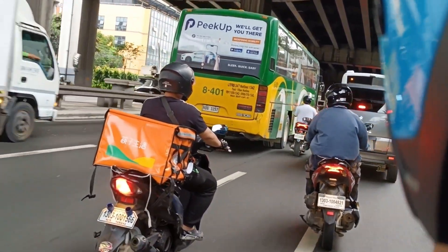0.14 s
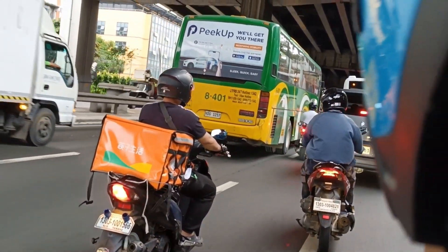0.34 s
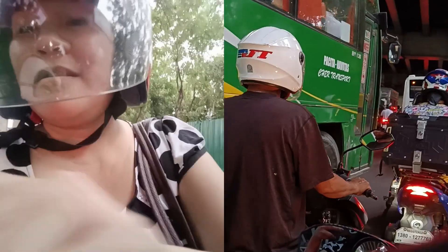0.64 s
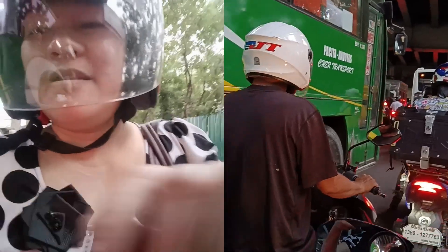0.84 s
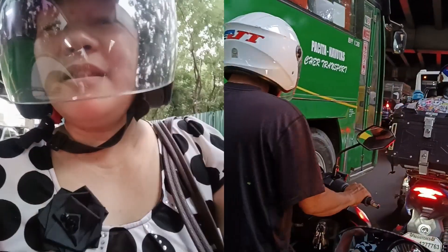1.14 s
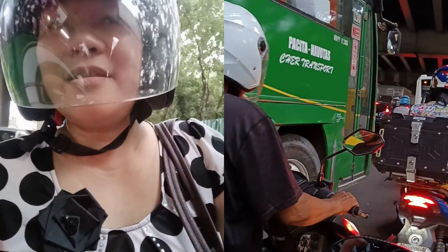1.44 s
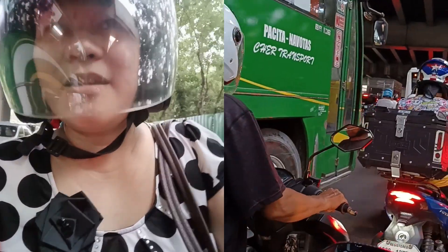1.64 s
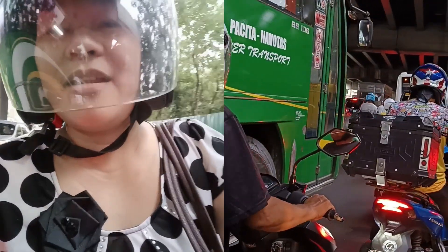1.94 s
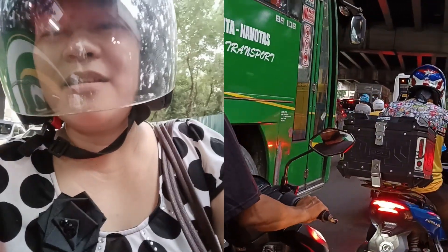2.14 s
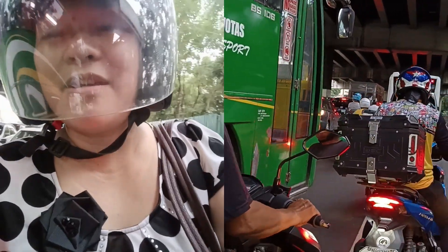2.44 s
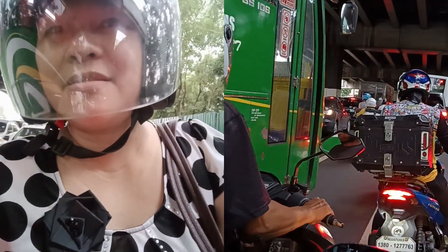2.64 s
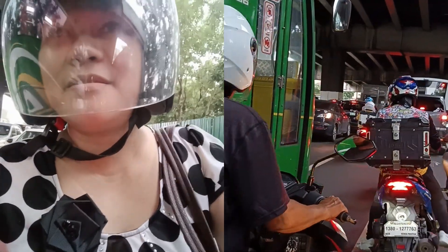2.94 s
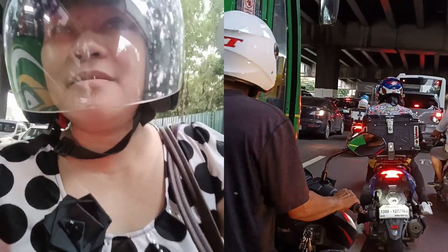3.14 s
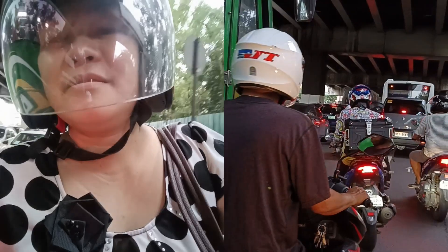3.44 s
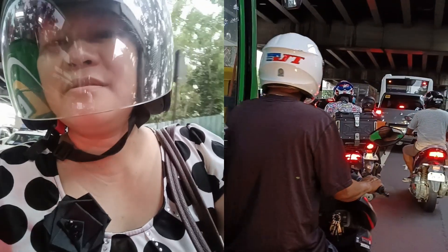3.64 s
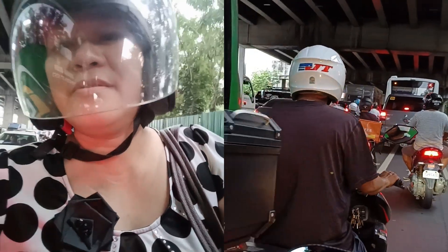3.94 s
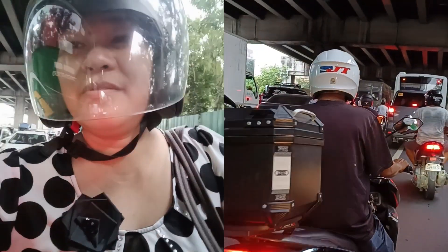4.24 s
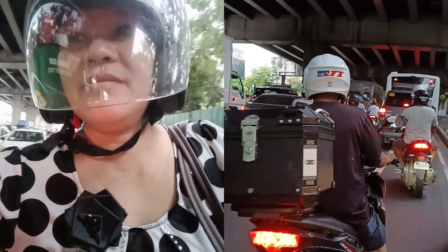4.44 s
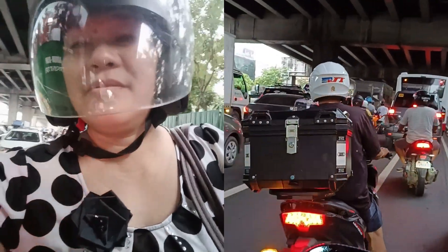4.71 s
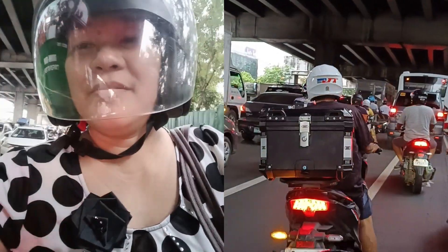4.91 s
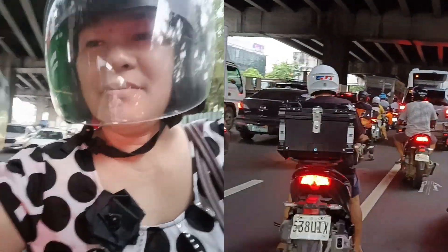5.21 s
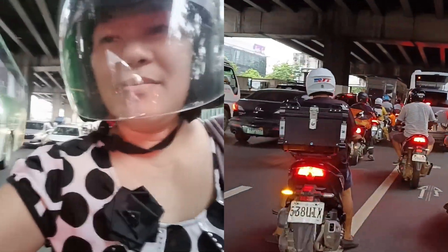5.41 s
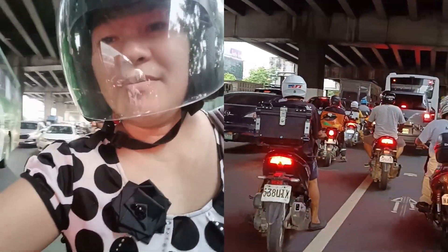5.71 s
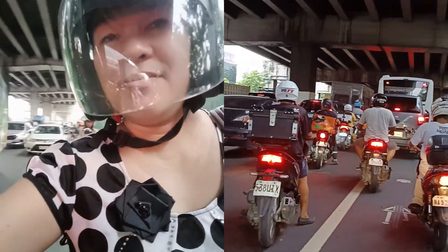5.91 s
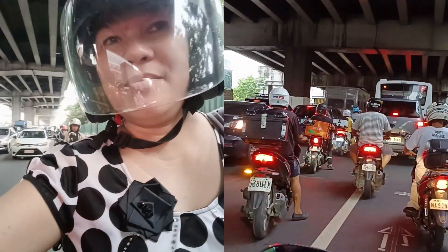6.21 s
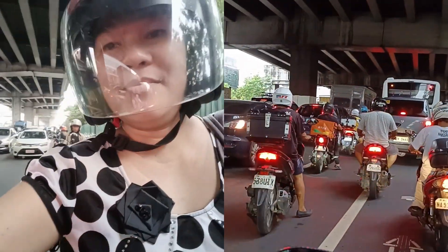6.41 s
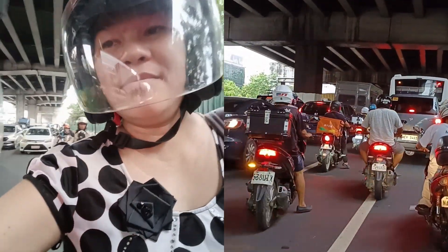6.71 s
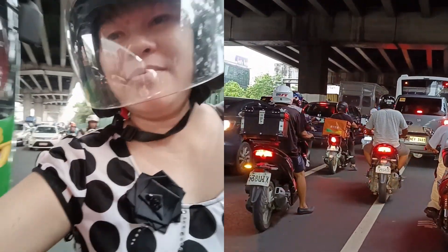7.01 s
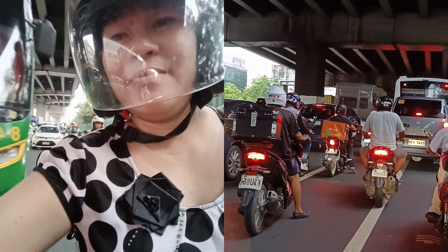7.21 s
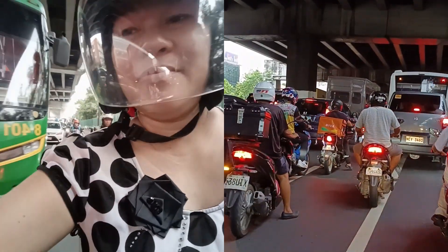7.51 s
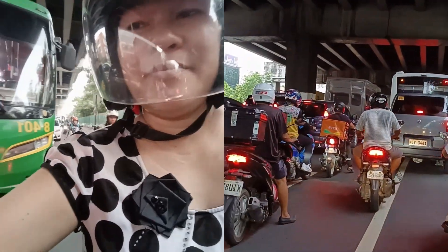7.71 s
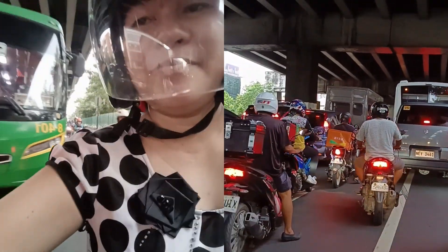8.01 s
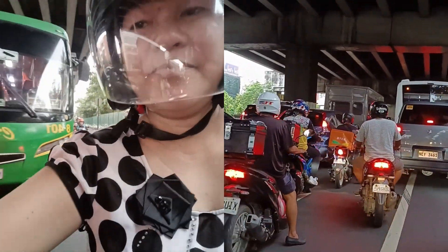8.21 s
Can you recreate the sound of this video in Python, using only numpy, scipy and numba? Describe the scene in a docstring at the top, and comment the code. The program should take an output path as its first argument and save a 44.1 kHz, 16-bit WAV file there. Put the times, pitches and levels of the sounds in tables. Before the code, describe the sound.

Heavy traffic rumble and nearby motorcycle engines under an echoing concrete flyover, a brief silence, then a bus revving, brake squeaks and many short horn toots.

```python
"""Dense traffic crawls under a concrete flyover, heard from a motorcycle seat through two unlike microphone ports.
Throughout, filtered noise makes the traffic rumble and ringing pulses make the nearby motorcycles.
The sound drops out from 0.46 to 1.04 s; then come the end of a passing horn's toot, its second toot, a revving
bus built from sine tones and the first noise squeaks. A car toots from 2 s, a scooter near 3 s, a truck from 5.4 s,
a far horn and a van near 8 s: horns are stacks of sine tones that ring under the deck. A limiter holds the peaks."""
import sys
import numpy as np
from scipy import signal
from scipy.fft import rfft, irfft
from scipy.io import wavfile
from scipy.ndimage import uniform_filter1d, minimum_filter1d
from numba import njit

SR = 44100
rng = np.random.default_rng(int(sys.argv[2]) if len(sys.argv) > 2 else 0)


def master_out(mix):
    """Clip the mix to full scale and print it as 16-bit PCM to the path in sys.argv[1]."""
    frames = np.transpose(np.atleast_2d(mix))
    ceiling = np.clip(frames, -1, 1)
    pcm = np.round(ceiling * 32767).astype(np.int16)
    wavfile.write(sys.argv[1], SR, pcm)


N = 368676

# How loud the traffic is over time. Each row: time in seconds, exhaust rumble in dB, engine clatter in dB,
# tyre and air hiss in dB.
TRAFFIC_LEVELS = [(0.0, -12.5, -22.5, -38), (0.45, -14.5, -24.5, -39), (1.05, -9.5, -18, -34.5),
                  (1.45, -11, -17, -31.5), (1.85, -14, -20.5, -37.5), (2.2, -12.5, -21, -34),
                  (2.65, -13, -19.5, -33), (2.95, -12.5, -20, -32), (3.1, -15, -22.5, -33),
                  (3.45, -15, -23, -39), (4.5, -14, -25, -40.5), (5.6, -14, -23.5, -40),
                  (6.65, -14.5, -24.5, -40.5), (7.25, -16, -25, -43), (7.85, -17.5, -24.5, -38.5),
                  (8.08, -18, -23, -40.5), (8.14, -16.5, -23, -37), (8.36, -16.5, -23, -35)]
# Tone colour of the traffic. Each row: frequency in Hz, relative density in dB per Hz.
TRAFFIC_SPECTRUM = [(12, -40.5), (20, -9.5), (69, -4.5), (138, 0), (228, -6.5), (263, -7.5), (447, -21.5),
                    (1040, -26.5), (1490, -32), (3450, -30), (5710, -51), (6950, -53), (8220, -41),
                    (13600, -67.5), (16100, -68)]
# How alike left and right are. Each row: frequency in Hz, likeness (1 is the same, 0 is unrelated).
LEFT_RIGHT_LIKENESS = [(25, 0.92), (60, 0.98), (180, 0.96), (300, 0.94), (600, 0.61), (1400, 0), (4000, 0),
                       (15000, 0)]
# Engine of the bus. Each row: time in seconds, firing rate in Hz, level in dB.
BUS_REVS = [(1.07, 34.47, -18.5), (1.176, 35.2, -13.5), (1.312, 38.2, -12), (1.554, 40.4, -12),
            (1.712, 40.21, -13.5), (1.986, 37.8, -20), (2.45, 36.2, -19), (2.67, 37.47, -23.5),
            (3.0, 35, -30)]
# Tones of the bus engine. Each row: multiple of the firing rate, relative level in dB.
BUS_TONES = [(2, -3.5), (3, -18), (4, -9.5), (5, 0), (6, -2.5), (7, -6.5), (9, -16)]
# Motorcycles close by. Each row: time in seconds, middle of the exhaust resonance in Hz, middle level in dB.
BIKE_EXHAUSTS = [(0.0, 125, -14.5), (0.45, 131, -21.5), (1.08, 146.6, -17.5), (1.6, 120, -15.5),
                 (1.9, 130.7, -12.5), (2.3, 152, -16.5), (2.95, 148, -14), (3.5, 128, -17),
                 (3.9, 157.3, -13), (4.4, 101.6, -21.5), (4.55, 126, -14), (5.05, 149, -16.5),
                 (5.42, 105.5, -19), (5.85, 124, -11.5), (6.4, 105.5, -18.5), (7.25, 95, -23.5),
                 (7.7, 123.6, -15.5), (7.9, 92, -18.5), (8.18, 102, -15.5), (8.36, 100, -19.5)]
# Brake squeaks and a belt whine. Each row: start in seconds, length in seconds, frequency in Hz,
# width in Hz of each of two equal resonances, level in dB, left minus right in dB.
SQUEAK_EVENTS = [(1.346, 0.32, 990, 36, -30, 8), (2.5, 0.43, 977.5, 19.7, -32, 12),
                 (2.621, 0.078, 8160, 450, -26, 1.5), (3.219, .07, 4380, 124, -30, 0),
                 (3.25, 0.07, 8800, 200, -40, 0), (7.74, .02, 2935, 90, -28, 1)]
# Toots shared by the low and high horn of one vehicle. Each row: start in seconds, length in seconds,
# relative level in dB, left minus right in dB.
CAR_TOOTS = [(2.003, 0.067, -28.5, 3.44), (2.15, 0.11, -29.5, 5.3), (2.31, 0.11, -30, 4.5),
             (2.88, 0.066, -26, 3.5)]
# Toots of the van. Each row: start in seconds, length in seconds, relative level in dB, left minus right in dB.
VAN_TOOTS = [(8.1, 0.069, -27.5, 3.1), (8.225, .14, -30, 3)]
# Each horn holds a pitch in Hz, then a list of partials, then a list of toots.
# Each partial: multiple of the pitch, relative level in dB. Each toot: the same columns as above.
PASSING = (389.0, [(7, -10), (8, -4), (9, 0.5), (10, -16), (21, -17)], [(.99, 0.092, -24, 4),
           (1.13, 0.065, -31.5, 4)])
CAR_LOW = (352.5, [(8, 0.5), (9, 1), (10, -14), (23, -25.5), (26, -43), (29, -24), (32, -21)], CAR_TOOTS)
CAR_HIGH = (417.5, [(6, -13.5), (7, 0), (8, -5), (9, -24), (19, -9.5), (20, -31), (25, -17), (26, -18)],
            CAR_TOOTS)
SCOOTER = (447.0, [(5, -26), (6, -14), (7, 0.5), (8, 1.5), (9, -16), (10, -31), (11, -33), (12, -33),
           (15, -34), (16, -33), (17, -30), (18, -32), (19, -29), (21, -26), (22, -35), (23, -26.5),
           (24, -27.5), (25, -42), (26, -37), (30, -37), (31, -37), (32, -50)], [(2.815, 0.062, -14.5, -3),
           (2.985, 0.11, -14.5, -2.5), (3.165, 0.17, -19.5, -3)])
TRUCK = (141.2, [(10, -18), (13, -27), (14, -19), (15, -14.5), (16, -10.5), (17, -8), (18, -11),
         (19, -12.5), (20, -17), (21, -11), (22, 4), (23, -29), (24, -13.5), (26, -23), (28, -28),
         (32, -28), (38, -26), (41, -30), (74, -39), (76, -37), (80, -35), (94, -44), (96, -49), (99, -38),
         (102, -43)], [(5.44, 0.095, -22, 0), (5.595, 0.055, -22.5, 0), (5.722, 0.062, -21.5, 0),
         (5.87, 0.093, -22.5, 0), (6.014, 0.077, -20.5, 0), (6.172, 0.066, -21, 0),
         (6.303, 0.091, -22.5, 0), (6.46, 0.07, -24, 0), (6.616, 0.086, -25, 0)])
FAR = (465.0, [(6, -14), (7, 0.5), (8, -1.5), (9, -18), (22, -44), (23, -31.5)], [(7.82, .2, -28, 0),
       (8.215, .15, -33.5, 0)])
VAN_LOW = (352.0, [(8, -7), (9, -5.5), (10, -18.5), (27, -30), (32, -34.5)], VAN_TOOTS)
VAN_HIGH = (415.0, [(6, -13.5), (7, 0.5), (8, -6.5), (9, -11.5), (18, -25), (19, -23), (25, -30.5)],
            VAN_TOOTS)
# Rattle of the truck horn's disc. Each row: frequency in Hz, width in Hz, level in dB relative to the toots.
TRUCK_DISC_RATTLE = [(2260, 180, -7), (2870, 180, -11.5), (3134, 7.5, 1), (3084, 6.7, -4), (3320, 63, -14),
                     (4150, 170, -16), (5070, 16, -13.5), (5110, 24, -14.5), (10500, 1200, -28),
                     (13900, 1200, -42)]
# Colour of the two microphone ports: the left peaks near 3 kHz, the right near 8 kHz.
# Each row: frequency in Hz, left minus right in dB.
PORT_DIFFERENCE = [(60, -1), (300, -1), (800, -3.5), (1100, -1.5), (1500, -2), (2100, -0.5), (2800, 6),
                   (3500, 6.5), (5000, 3.5), (6200, 3), (8200, -28.5), (10000, -14), (12500, -12.5),
                   (14500, -1)]

# restless throttles: speed of the drift, spread of the resonance as a share, spread of the level
THROTTLE_HZ, THROTTLE_PITCH_SHARE, THROTTLE_DB = 4.0, .06, 1.5
DECK_T60_S, DECK_DB, DECK_BAND_HZ = 1.26, -0.3, [2420, 5700]   # T60: time to fade by 60 dB
DROPOUT_START_S, DROPOUT_END_S = .4635, 1.0445
LIMIT_DB, RELEASE_DB_PER_S = -.15, 84
CUTOFF_HZ = 16350


def from_db(db):
    """Turn a level in dB into a gain."""
    return 10 ** (np.asarray(db) / 20)


def rms_one(x):
    """Scale a sound to an rms (average strength) of 1."""
    return x / np.sqrt(np.mean(x ** 2) + 1e-20)


def in_time(rows):
    """Read each column of a time table at every sample."""
    seconds, *columns = np.transpose(rows)
    return [np.interp(np.arange(N) / SR, seconds, column) for column in columns]


def at_hz(points, hz):
    """Read a frequency table, with straight lines on a log-frequency axis."""
    table_hz, values = np.array(points).T
    return np.interp(np.log(hz), np.log(table_hz), values)


def bins_hz():
    """Frequency of each FFT bin, never below 1 Hz."""
    return np.maximum(np.arange(N // 2 + 1) * SR / N, 1)


def drift(rate_hz, size=N):
    """Slow chance: noise at every 40th sample, smoothed by two equal low-passes, with a spread of about 1."""
    r = np.exp(-80 * np.pi * rate_hz / SR)
    noise = rng.standard_normal(size // 40 + 2002)
    slow = signal.lfilter([1], [1, -2 * r, r * r], noise)[2000:]   # skip the filter's start
    return np.interp(np.arange(size) / 40, np.arange(len(slow)), rms_one(slow))


def resonate(x, hz, width_hz):
    """Make a sound ring at one frequency; a narrower width rings longer."""
    r = np.exp(-np.pi * width_hz / SR)
    return signal.lfilter([1, 0, -1], [1, -2 * r * np.cos(2 * np.pi * hz / SR), r * r], x)


def gate(start_s, length_s, rise_s, fall_s):
    """Switch on with a straight rise, hold, then fade exponentially."""
    t = np.arange(N) / SR - start_s
    return np.clip(t / rise_s, 0, 1) * np.exp(-np.maximum(t - length_s, 0) / fall_s)


def left_right(level_db, pan_db):
    """Gains of left and right, with the level difference shared equally."""
    return from_db(level_db + pan_db * np.array([[.5], [-.5]]))


def traffic(patchy_db, flicker_db):
    """Many engines and tyres blur into noise; each octave swells on its own and follows its group's level."""
    mid, side = rfft(rng.standard_normal((2, N)))
    hz = bins_hz()
    alike = np.clip(at_hz(LEFT_RIGHT_LIKENESS, hz), -1, 1)
    stereo = np.sqrt(1 + alike) * mid + np.sqrt(1 - alike) * side * [[1], [-1]]
    coloured = from_db(at_hz(TRAFFIC_SPECTRUM, hz)) * stereo
    octave = np.clip(np.log2(hz / 30), 0, 9)   # octaves above 30 Hz
    groups = np.zeros((3, 2, N))   # rumble, clatter, hiss
    together = drift(2.0)
    for k in range(10):
        overlap = np.cos(np.clip(octave - k, -1, 1) * np.pi / 2) ** 2
        band = irfft(coloured * overlap, N)
        swell_db = patchy_db * (together + drift(8.6)) + flicker_db * drift(18)
        groups[(k > 3) + (k > 7)] += band * from_db(swell_db)
    levels = in_time(TRAFFIC_LEVELS)
    return sum(from_db(level_db) * rms_one(group) for group, level_db in zip(groups, levels))


def bus():
    """A diesel's firing makes clean tones at multiples of its rate, which rise and sag with the revs."""
    hz, level_db = in_time(BUS_REVS)
    phase = 2 * np.pi * np.cumsum(hz) / SR
    tones = 0
    for multiple, db in BUS_TONES:
        strength = from_db(db + 1.2 * drift(3.8))
        tones = tones + strength * np.sin(round(multiple) * phase + 2 * np.pi * rng.random())
    return np.sqrt(2) * from_db(level_db) * gate(.9, 1.88, 0.04, 0.23) * tones


@njit
def moving_ring(x, turn, r):
    """A resonance whose frequency moves; each output sample depends on the two before it."""
    out = np.zeros(len(x))
    for i in range(2, len(x)):
        out[i] = x[i] + 2 * r * turn[i] * out[i - 1] - r * r * out[i - 2]
    return out


def bikes(firings_per_s, jitter, uneven_db, width_hz):
    """Uneven firings thump into an exhaust resonance that wanders with the throttle."""
    hz, level_db = in_time(BIKE_EXHAUSTS)
    hz = hz * (1 + THROTTLE_PITCH_SHARE * drift(THROTTLE_HZ))
    level_db = level_db + THROTTLE_DB * drift(THROTTLE_HZ)
    firing_count = np.cumsum(firings_per_s * (1 + jitter * drift(25))) / SR
    fired = np.diff(np.floor(firing_count), prepend=0) > 0
    pulses = fired * from_db(uneven_db * rng.standard_normal(N))
    boom = moving_ring(pulses, np.cos(2 * np.pi * hz / SR), np.exp(-np.pi * width_hz / SR))
    boom = signal.sosfilt(signal.butter(2, 60, "high", fs=SR, output="sos"), boom)
    return from_db(level_db) * rms_one(boom)


def squeaks():
    """Pads chatter on a disc and a belt slips: noise passed twice through a narrow resonance."""
    out = np.zeros((2, N))
    for start_s, length_s, hz, width_hz, db, pan_db in SQUEAK_EVENTS:
        ringing = resonate(rng.standard_normal((2, N)), hz, width_hz)
        ringing = resonate(ringing, hz, width_hz)
        out += left_right(db, pan_db) * gate(start_s, length_s, 0.013, 0.053) * rms_one(ringing)
    return out


def horn(pitch_hz, partials, toots, waver, sag, rise_s, disc=(), diaphragm=None):
    """A buzzing diaphragm: harmonics of a wavering pitch that starts flat; a loose disc can add rattle."""
    first = max(round((toots[0][0] - .05) * SR), 0)
    last = min(round((toots[-1][0] + toots[-1][1] + .5) * SR), N)
    size = last - first
    pressed = np.zeros((2, size))
    flat = np.zeros(size)
    for start_s, length_s, db, pan_db in toots:
        pressed += left_right(db, pan_db) * gate(start_s, length_s, rise_s, 0.014)[first:last]
        flat += gate(start_s, 0, 0.00099, .03)[first:last]
    hz = pitch_hz * (1 + waver * drift(40, size=size) - sag * flat)
    phase = 2 * np.pi * np.cumsum(hz) / SR
    tone = 0
    for multiple, db in partials:
        # moving reflections make each partial flutter and shift in phase between the two ports
        apart = .7 * drift(6, size=size) * [[1], [-1]]   # radians
        flutter_db = 2.5 * np.array([drift(25, size=size), drift(25, size=size)])
        wave = np.sin(round(multiple) * phase + 2 * np.pi * rng.random() + apart)
        tone = tone + from_db(db + flutter_db) * wave
    sound = 2 * pressed * tone
    if diaphragm:   # the lowest tone sits on the diaphragm's own resonance (Hz, relative dB) and lingers
        own_hz, db = diaphragm
        lingering = signal.lfilter([.0006], [1, -.9994], pressed)   # slow build and fade
        own_phase = 2 * np.pi * np.cumsum(own_hz * (1 + 0.0074 * drift(14.7, size=size))) / SR
        sound += 2 * from_db(db) * lingering * np.sin(own_phase)
    for disc_hz, width_hz, db in disc:   # rattle rings on after the toot
        rattle = resonate(pressed * rng.standard_normal((2, size)), disc_hz, width_hz)
        sound += from_db(db) * rms_one(rattle) * np.sqrt(np.mean(pressed ** 2))
    out = np.zeros((2, N))
    out[:, first:last] = sound
    return out


def deck(x):
    """The flyover returns a dense fading tail of noise, heard only where the horns are brightest."""
    t = np.arange(SR * 2) / SR
    tail = rng.standard_normal((2, len(t))) * from_db(-60 * t / DECK_T60_S)
    tail *= t > .015   # the tail starts 15 ms late
    tail /= np.sqrt(np.sum(tail ** 2, axis=1, keepdims=True))
    wet = signal.fftconvolve(x, tail, axes=1)[:, :N]
    b, a = signal.butter(2, DECK_BAND_HZ, "band", fs=SR)
    return from_db(DECK_DB) * signal.lfilter(b, a, wet)


def scene():
    """Traffic all around, engines in the middle, horns with the ring of the deck (more for the far ones)."""
    engines = bus() + bikes(firings_per_s=30, jitter=.3, uneven_db=3.0, width_hz=19.8)
    far_horns = (PASSING, CAR_LOW, CAR_HIGH, FAR, VAN_LOW, VAN_HIGH)
    cars = sum(horn(*h, waver=.005, sag=.006, rise_s=.015) for h in far_horns)
    scooter = horn(*SCOOTER, waver=0.0026, sag=0.0057, rise_s=.006, diaphragm=(437, -8))
    truck = horn(*TRUCK, waver=0.008, sag=.018, rise_s=0.0035,
                 disc=TRUCK_DISC_RATTLE, diaphragm=(275, 4))
    ring = deck(from_db(-4.0) * truck + from_db(-2.5) * scooter + from_db(-1.0) * cars)
    background = traffic(patchy_db=-0.4, flicker_db=0.67)
    return background + engines + squeaks() + cars + scooter + truck + ring


def record(dry):
    """Colour the two ports, limit both channels together, drop out, then cut the top of the treble."""
    ratio = from_db(at_hz(PORT_DIFFERENCE, bins_hz())) ** 2   # left power over right power
    port_gains = np.sqrt(2 * np.array([ratio, np.ones_like(ratio)]) / (1 + ratio))
    x = irfft(rfft(dry) * port_gains, N)
    peak_db = 20 * np.log10(np.abs(x).max(axis=0) + 1e-9)
    over_db = np.maximum(peak_db - LIMIT_DB, 0)
    t = np.arange(N) / SR
    ramp_db = RELEASE_DB_PER_S * t
    ahead_db = -minimum_filter1d(-over_db, size=257)   # the gain starts down just before a peak
    released_db = np.maximum.accumulate(ahead_db + ramp_db) - ramp_db   # and recovers steadily
    held_db = uniform_filter1d(released_db, size=257)
    audible = (t < DROPOUT_START_S) | (t > DROPOUT_END_S)
    x = x * from_db(-held_db) * audible
    low_pass = signal.cheby2(12, 70, CUTOFF_HZ, fs=SR, output="sos")
    return np.clip(signal.sosfilt(low_pass, x), -1, 1)


dry = scene()
out = record(dry)
master_out(out)
```